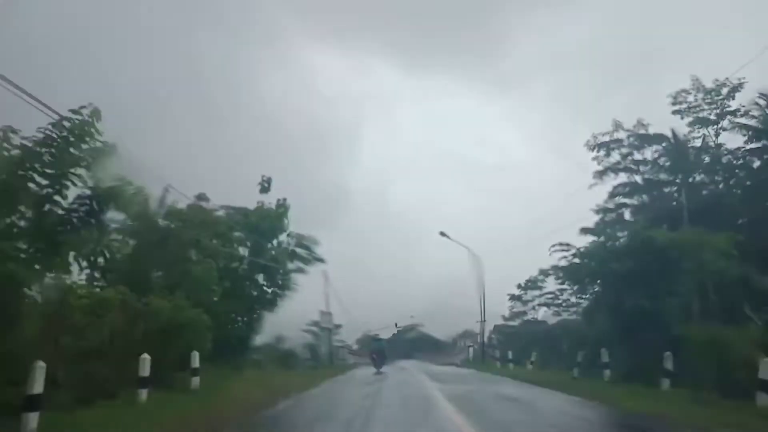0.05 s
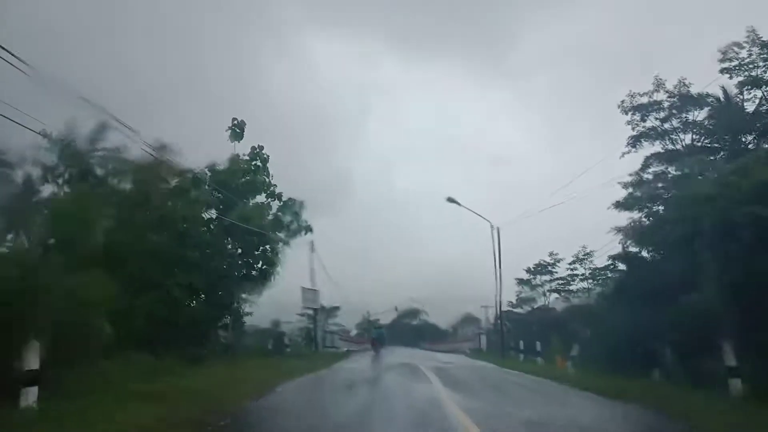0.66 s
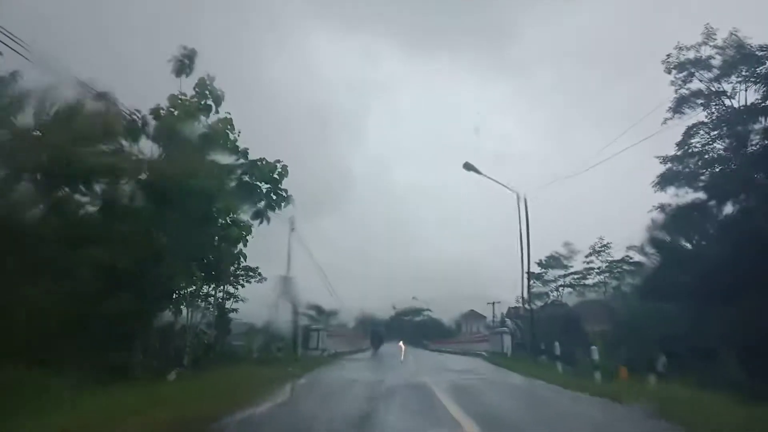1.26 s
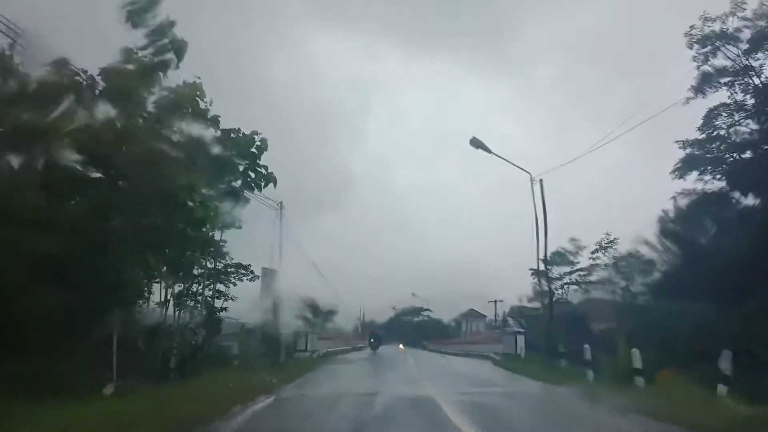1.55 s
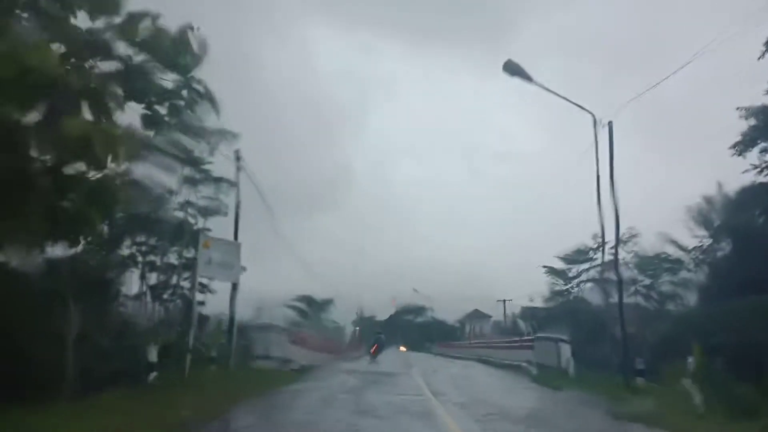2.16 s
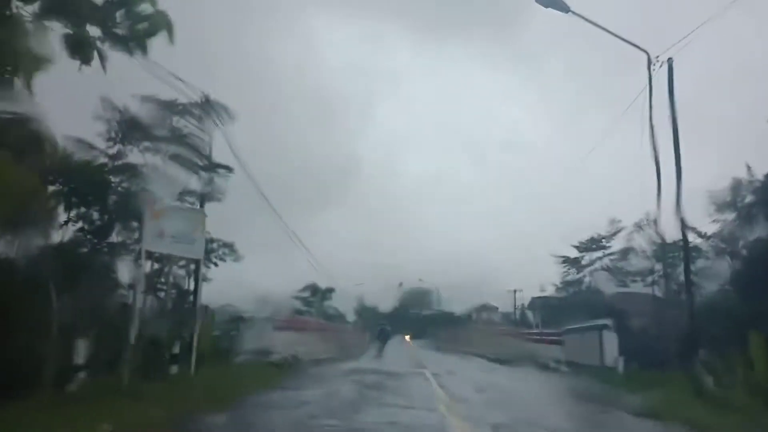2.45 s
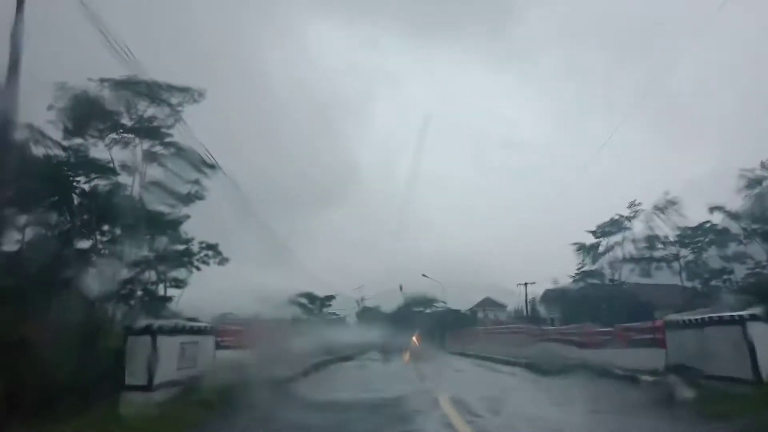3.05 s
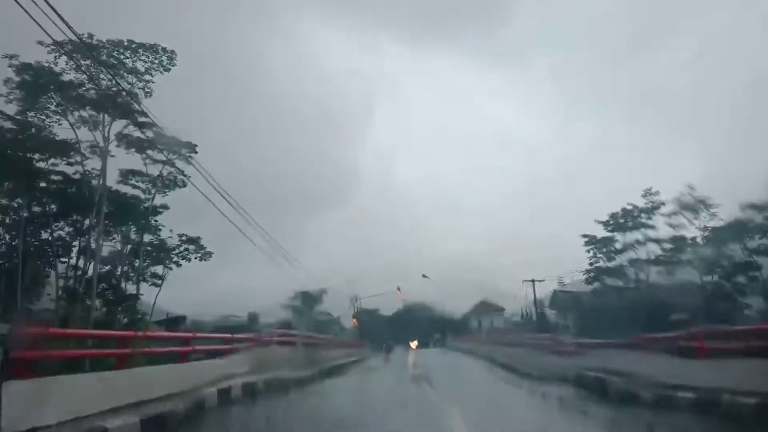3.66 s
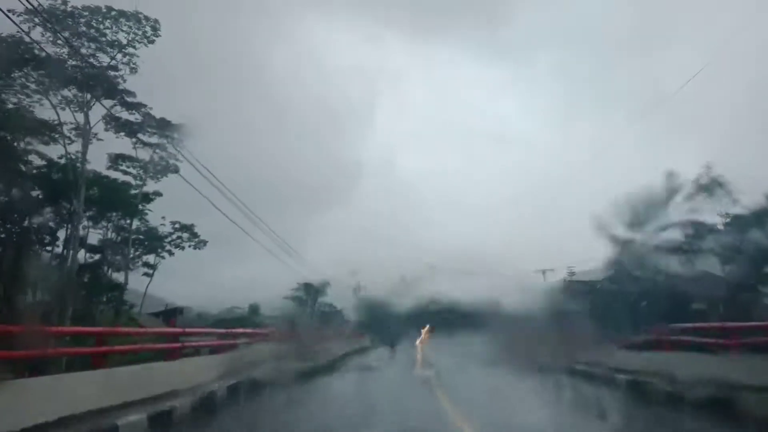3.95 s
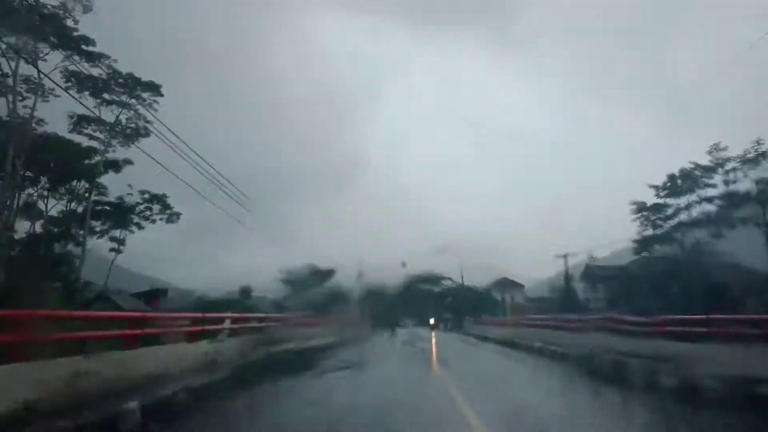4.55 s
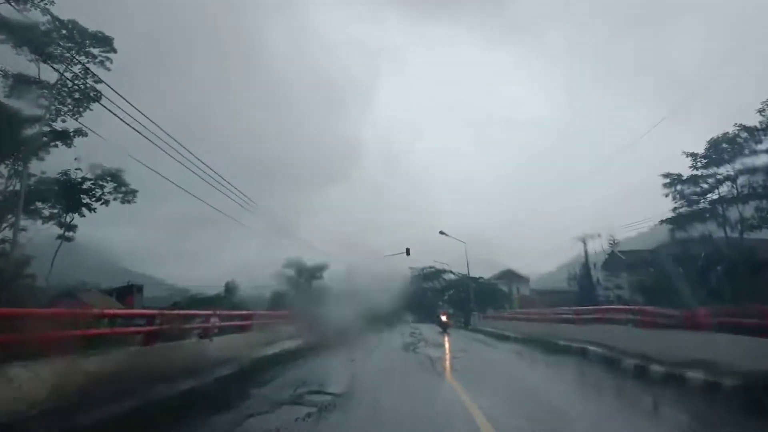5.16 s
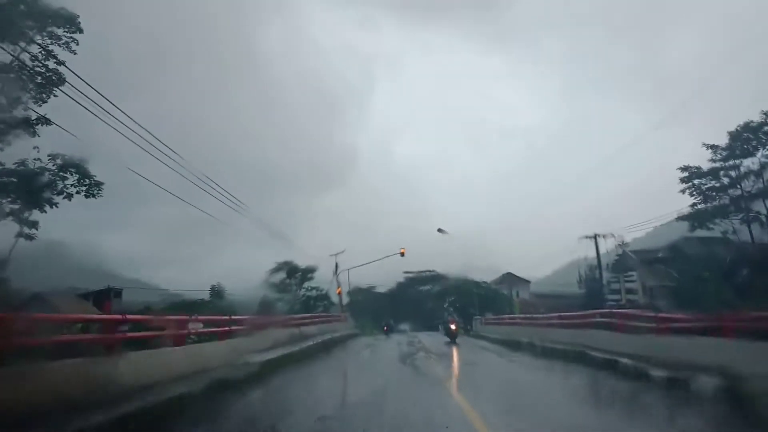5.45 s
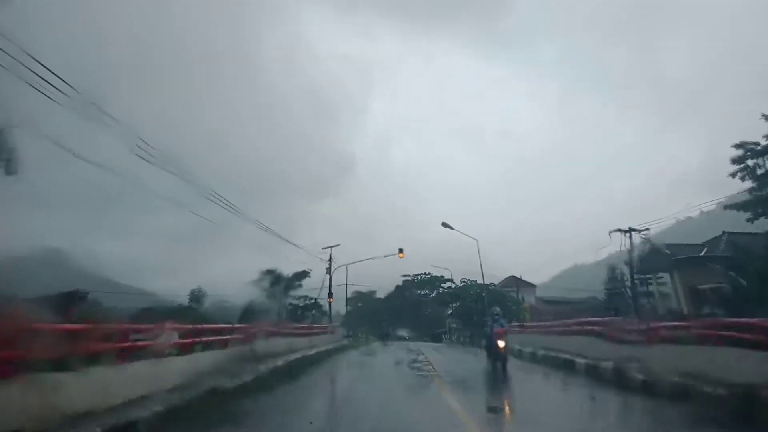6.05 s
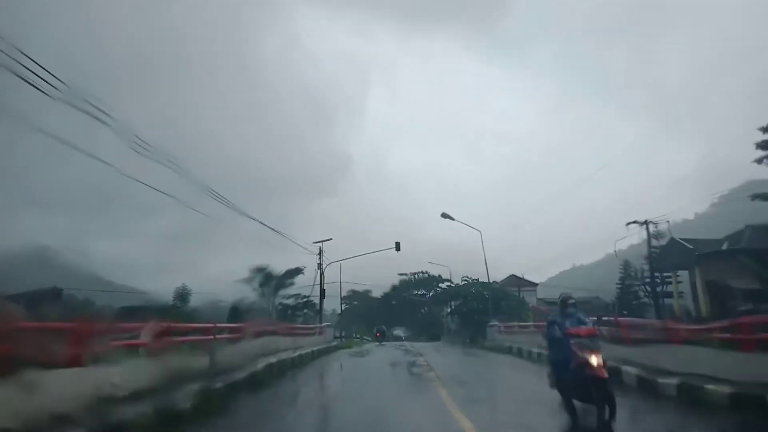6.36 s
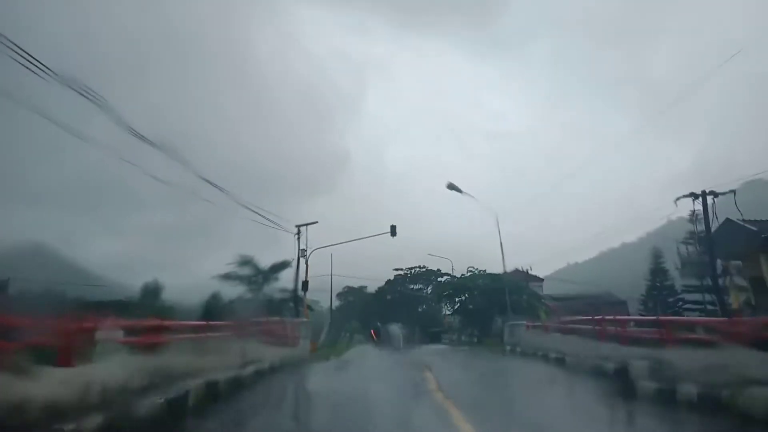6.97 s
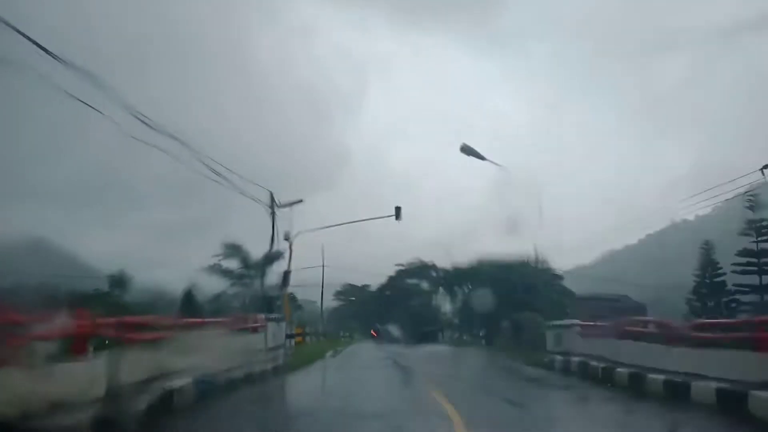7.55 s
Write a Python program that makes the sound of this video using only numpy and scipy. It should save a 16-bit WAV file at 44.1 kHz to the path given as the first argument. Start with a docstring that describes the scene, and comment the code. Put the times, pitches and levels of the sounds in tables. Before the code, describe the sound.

Inside a car driving through heavy rain, tyres rumble, drops tap the glass, a wiper occasionally knocks and road bumps thud.

```python
"""Driving through heavy rain

Inside a car, the tyres rumble and boom over a low engine hum. Drops patter on the windscreen
and drum on the roof, and water swishes under the wheels. The wiper knocks and squeaks as it
sweeps. Bumps at a bridge thump the body and make the plastic trim click."""
import sys
import numpy as np
from scipy import signal
from scipy.fft import rfft, irfft
from scipy.io import wavfile
from scipy.ndimage import uniform_filter1d

SR = 44100
rng = np.random.default_rng(int(sys.argv[2]) if len(sys.argv) > 2 else 0)


def wav_record(signal):
    """Record a signal, one row per channel, as 16-bit PCM in the file named by sys.argv[1]."""
    frames = np.transpose(np.atleast_2d(signal))
    bounded = np.clip(frames, -1, 1)
    # unit amplitude maps onto the largest positive 16-bit level
    quanta = np.round(bounded * 32767).astype(np.int16)
    wavfile.write(sys.argv[1], SR, quanta)


N = 344421
TIME = np.arange(N) / SR
RING_TIME = TIME[:SR // 4]

# tone of the road noise in the cabin: pitch_hz, level_db
ROAD_TONE = [(20, -53.5), (32, -28.5), (49, -10.5), (65, -3.5), (82, -6.5), (118, -8.5), (190, -9.5),
             (290, -12.5), (460, -17.5), (680, -23), (850, -31.5), (1300, -39.5), (3000, -72),
             (12000, -110)]
# pitches that the cabin air and panels boost: pitch_hz, width_hz, added_level_db
CABIN_RESONANCES = [(82.6, 3.7, -5), (136.4, 9, -4.5), (164, 18, -3), (194, 30, -4), (263.1, 17, 0.5),
                    (314.2, 17, 2), (426, 37, -11.5), (641, 16, -8.5), (702, 21, -6)]
# tyre noise on rougher and smoother road: time_s, level_db
TYRE_LEVELS = [(0, -23.5), (1.1, -23.5), (1.8, -26), (2.9, -23), (3.8, -22.5), (4.85, -24.5), (5.45, -23),
               (6.6, -23.5), (7.8, -23)]
# uneven stretches of road: start_s, length_s, shake_db, boom_db
UNEVEN_ROAD = [(2.624, 0.085, -43, -23), (3.202, 0.36, -36, -21), (4.22, 0.49, -31, -25.5),
               (5.834, 0.22, -30, -19), (6.2, 0.32, -28, -29), (7.488, .02, -31, -31)]
# how fast the engine fires as the car eases off, then speeds up: time_s, rate_hz
FIRING_RATES = [(0, 47), (1, 46.5), (2.3, 44.75), (3.2, 44.85), (4.3, 45.05), (5, 45.85), (6, 47.15),
                (7.8, 48.7)]
# engine overtones and gear whines: times_firing_rate, start_s, length_s, level_db
WHINES = [(2, 5.2, 1.2, -32), (4, 5.8, 1.6, -37), (6, 5.2, 1, -37), (8, 5.6, 2.2, -42),
          (9, 5.3, 1.1, -42.5), (10.15, 2.1, 4.1, -43), (14, 5.2, 1.4, -45), (18.75, 2.5, 1.9, -52.5),
          (18.75, 5.1, .9, -50.5)]
# notes that the road keeps going in the cabin: pitch_hz, start_s, length_s, level_db
DRONES = [(134.5, 0, 3.9, -31.5), (81, 6.04, .48, -21.5), (81, 6.78, .2, -23), (260, 6.0, 1.0, -31),
          (932, 6.77, .22, -48)]
# strength of the rain: time_s, level_db
RAIN_LEVELS = [(0, -42.5), (1.5, -44.5), (2.5, -43), (4.2, -43.5), (4.8, -44.5), (5.6, -42), (7.8, -43)]
# tone of rain heard through glass and roof lining: pitch_hz, level_db
RAIN_TONE = [(300, -19), (850, -0.5), (1200, -5.5), (1600, 1.5), (2050, -2.5), (2550, 0), (3200, -4.5),
             (4000, -11.5), (5000, -20.5), (6800, -28), (8600, -33), (10500, -43.5), (15000, -54.5)]
# notes at which the windscreen rings: pitch_hz
WINDSCREEN_HZ = [2620, 2540, 2870, 3150]
# puddles under the wheels: start_s, length_s, level_db
PUDDLES = [(5.4, .02, -43), (5.587, 0.055, -36.5), (6.77, 0.19, -38)]
# bumps that thump the body: start_s, peak_db, pitch_hz, rise_s, decay_s
BUMPS = [(0.039, -10, 378, 0.0023, 0.0052), (0.056, -10.5, 99, 0.0023, 0.012),
         (0.489, -20, 174, 0.01, 0.02), (0.965, -18, 163, .008, 0.031), (3.726, -11, 292, 0.0018, 0.0043),
         (3.747, -15, 163, 0.0015, 0.0093), (4.217, -7, 210, 0.0031, 0.0049),
         (4.229, -14.5, 49, 0.0045, 0.044), (4.249, -12, 151, 0.0017, .022),
         (4.296, -12.5, 121, .003, 0.018), (4.264, -16, 341, 0.0022, 0.0077),
         (4.353, -13.5, 58, 0.003, 0.016), (4.514, -6.5, 68, 0.0035, 0.01),
         (5.689, -15, 182, 0.0075, 0.021), (5.883, -8, 88, .01, 0.025), (5.889, -15, 433, .003, 0.014),
         (5.893, -11.5, 191, 0.0033, .016), (5.937, -9, 83, .025, 0.026), (7.482, -7.5, 125, 0.0041, 0.006)]
# the fattest drops on the windscreen: start_s, level_db, pitch_hz
BIG_DROPS = [(0.083, -23, 2900), (0.214, -24, 2520), (0.9968, -22, 2550), (1.701, -31, 1830),
             (2.037, -24.5, 2800), (2.368, -20.5, 2680), (2.489, -20.5, 2900), (3.6366, -27, 2690),
             (5.9955, -26, 2870), (6.3005, -24, 3050), (7.4445, -23.5, 2580), (7.5595, -23, 2500)]
# water flung by the wiper: start_s, length_s, level_db
FLUNG_WATER = (3.175, 0.17, -63.5)
# ringing of the wiper arm and the panel under it: pitch_hz, level_db, decay_s
WIPER_NOTES = [(423, 1, 0.0055), (600, 4, 0.0026), (984, -3.5, 0.0019), (1250, -5, 0.0014),
               (1605, -1, 0.0016), (2750, -13, .0012)]
# knocks as the blade flips and turns: start_s, peak_db, brightness_hz
WIPER_KNOCKS = [(3.1795, -17, 3500), (3.2005, -13, 3500), (3.206, -6.5, 1800), (3.8265, -13.5, 1300),
                (7.5045, -14, 805), (7.5114, -9, 1560)]
# the blade slaps the glass: start_s, peak_db
BLADE_SLAPS = [(3.179, -21), (3.2002, -17), (7.498, -27), (7.504, -24)]
# the arm shudders at the far end of its sweep: time_s, peak_db, pitch_hz
ARM_SHUDDERS = [(3.786, -12.5, 357), (3.831, -16, 473), (3.8435, -7.5, 387)]
# rubber scrapes the glass: start_s, length_s, level_db
BLADE_SCRAPES = [(3.182, 0.023, -34.5), (7.485, 0.026, -35)]
# thin wiper squeaks: peak_time_s, rise_s, peak_db
SQUEAKS = [(3.35, .02, -57), (3.43, .02, -66), (4.61, .015, -59), (4.73, 0.046, -60)]
# ringing of the plastic trim: pitch_hz, level_db, decay_s
TRIM_NOTES = [(1690, 1, 0.004), (3130, 19, 0.00055), (4000, 12, 0.00057), (5300, 3, 0.00035),
              (8100, -15, .0005)]
# the jolted dashboard clicks: start_s, level_db, brightness_hz
TRIM_CLICKS = [(4.2543, -4.5, 5900), (4.2573, -15, 4000), (4.285, -21, 6000), (4.293, -19.5, 4500),
               (4.3158, -20.5, 2400), (4.341, -22.5, 2500), (4.469, -22, 2400), (4.4755, -23, 2400),
               (4.553, -23, 2500), (4.605, -26, 2500)]
# loose trim rattles while the body shakes: peak_time_s, level_db
TRIM_RATTLES = [(4.215, -31.5), (4.297, -33.5), (4.472, -35.5)]


def gain(db):
    """Turn decibels into a number to multiply by."""
    return 10 ** (np.asarray(db) / 20)


def unit(x):
    """Scale a signal to an average (rms) strength of 1."""
    return x / np.sqrt(np.mean(x ** 2))


def combined_db(*gains):
    """The level of unrelated sounds heard together."""
    return 10 * np.log10(sum(g ** 2 for g in gains))


def curve(rows):
    """Join (time, value) points with straight lines."""
    return np.interp(TIME, *np.transpose(rows))


def wander(rate_hz):
    """A smooth random wobble with a typical size of 1."""
    step = max(int(SR / rate_hz), 2)
    levels = np.repeat(rng.standard_normal(N // step + 1), step)
    return unit(uniform_filter1d(levels, step)[:N])


def swell(start_s, length_s, rise_s, fade_s):
    """A loudness shape that is full by start_s, holds for length_s and dies away."""
    before = np.minimum(TIME - start_s, 0)
    after = np.maximum(TIME - start_s - length_s, 0)
    return np.exp(before / rise_s - after / fade_s)


def band(x, low_hz, high_hz, order=2):
    """Keep the sound between two pitches."""
    edges_hz = [low_hz, min(high_hz, SR / 2 - 1)]
    return signal.sosfilt(signal.butter(order, edges_hz, "band", fs=SR, output="sos"), x)


def shape_tone(x, points, size=8192):
    """Turn each pitch up or down, following (pitch_hz, level_db) points."""
    hz, db = np.transpose(points)
    grid_hz = np.maximum(np.arange(size // 2 + 1) * SR / size, 1)
    response = gain(np.interp(np.log(grid_hz), np.log(hz), db))
    # make the filter ring only after a hit, never before it
    cepstrum = irfft(np.log(response))
    cepstrum[1:size // 2] *= 2
    cepstrum[size // 2 + 1:] = 0
    return signal.fftconvolve(x, irfft(np.exp(rfft(cepstrum))))[:N]


def add(out, start_s, x, peak_db):
    """Mix a short sound in at the given time and peak level."""
    i = int(start_s * SR)
    out[i:i + len(x)] += (gain(peak_db) * x / np.abs(x).max())[:N - i]


def ring(hz, decay_s):
    """One note that dies away after a hit."""
    return np.sin(2 * np.pi * hz * RING_TIME) * np.exp(-RING_TIME / decay_s)


def impacts(per_s, spread_db, cap):
    """Hits at random times; each one's level is spread_db times a random size up to cap."""
    chance, size = rng.random(N), rng.exponential(size=N)
    hits = np.flatnonzero(chance < per_s / SR)
    out = np.zeros(N)
    out[hits] = gain(spread_db * np.minimum(size[hits], cap)) * rng.choice([-1, 1], N)[hits]
    return out


def scatter(hits, tail_db, decay_s):
    """Give each hit a short tail of scattered sound."""
    fade = np.exp(-1 / (decay_s * SR))
    energy = signal.lfilter([1 - fade], [1, -fade], hits ** 2)
    return hits + gain(tail_db) * np.sqrt(energy) * rng.standard_normal(N)


def road_levels(tyre_db):
    """Uneven road adds shake and boom, and each bump adds a burst of tyre roar."""
    shakes, booms, roars = [gain(-34)], [gain(-25.5)], [gain(tyre_db)]  # on even road
    for start_s, length_s, shake_db, boom_db in UNEVEN_ROAD:
        rocking = swell(start_s, length_s, rise_s=0.096, fade_s=0.12)
        shakes.append(rocking * gain(shake_db))
        booms.append(rocking * gain(boom_db))
    for start_s, db, *_ in BUMPS:
        roars.append(swell(start_s, 0, rise_s=0.0099, fade_s=0.074) * gain(db - 12.5))
    return combined_db(*shakes), combined_db(*booms), combined_db(*roars)


def road(shake_db, boom_db, roar_db):
    """The rough road shakes the body, booms in the cabin air and roars through the floor."""
    noise = shape_tone(rng.standard_normal(N), ROAD_TONE)
    noise = noise + sum(gain(db) * band(noise, hz - width / 2, hz + width / 2, order=1)
                        for hz, width, db in CABIN_RESONANCES)
    shake = unit(band(noise, 25, 60.8, order=6)) * gain(shake_db + 1.1)
    boom = unit(band(noise, 66.1, 109, order=4)) * gain(boom_db - 1)
    roar = unit(band(noise, 107, 16000, order=6)) * gain(roar_db + 0.5 * wander(14))
    return shake + boom + roar


def engine(boom_db, hum_hz=81.5):
    """A low hum swells with the cabin boom, and faint whines follow the engine's speed."""
    hum_phase = 2 * np.pi * np.cumsum(hum_hz * (1 + 0.02226 * wander(10))) / SR
    out = unit(np.sin(hum_phase)) * gain(boom_db - 7.5 + 1.3 * wander(4.1))
    firing_hz = curve(FIRING_RATES) * (1 + 0.0014 * wander(20))
    firing_phase = 2 * np.pi * np.cumsum(firing_hz) / SR
    for multiple, start_s, length_s, db in WHINES:
        whine = unit(np.sin(multiple * firing_phase)) * gain(db + 2.8 * wander(10))
        out += whine * swell(start_s, length_s, rise_s=0.18, fade_s=0.18)
    return out


def cabin_drones():
    """The road keeps the cabin and its panels ringing on slightly wavering notes."""
    out = np.zeros(N)
    for hz, start_s, length_s, db in DRONES:
        phase = 2 * np.pi * np.cumsum(hz + 1.592 * wander(12)) / SR
        note = unit(np.sin(phase)) * gain(db + 1.5 * wander(9))
        out += note * swell(start_s, length_s, rise_s=0.09, fade_s=0.085)
    return out


def glass_tap(hz, rise_s=0.00034):
    """The windscreen rings very briefly under a soft blow."""
    return ring(hz, decay_s=0.00048) * (1 - np.exp(-RING_TIME / rise_s))


def rain():
    """Each patch of glass rings at its own pitch. Small drops tick, fine ones hiss, the roof drums."""
    glass = 0
    for hz in np.geomspace(1000, 7000, num=9):
        hits = scatter(impacts(per_s=130, spread_db=4, cap=3.2), tail_db=0.5, decay_s=0.0011)
        glass = glass + band(hits, hz / 1.51, hz * 1.46, order=1)
    fine_drops = impacts(per_s=3000, spread_db=-0.5, cap=1.5)
    patter = unit(shape_tone(glass, RAIN_TONE))
    hiss = unit(shape_tone(fine_drops, RAIN_TONE)) * gain(-2)
    ringing = sum(signal.fftconvolve(impacts(per_s=46, spread_db=6, cap=2.47), glass_tap(hz))[:N]
                  for hz in WINDSCREEN_HZ)
    pings = unit(band(ringing, 1300, 3900)) * gain(-4)
    small_drops = scatter(impacts(per_s=75, spread_db=7, cap=2.5), tail_db=-4, decay_s=0.0012)
    ticks = unit(band(shape_tone(small_drops, RAIN_TONE), 4200, 15000, order=1))
    ticks *= gain(-10.5 + wander(4.7))
    roof = unit(band(impacts(per_s=130, spread_db=-0.5, cap=6.2), 260, 750)) * gain(-3)
    return (patter + hiss + pings + ticks + roof) * gain(curve(RAIN_LEVELS) + 0.37 * wander(20))


def wheel_spray(tyre_db):
    """Water swishes and drums on the wheel arches: a little all the time, more in puddles."""
    puddles = (swell(start_s, length_s, rise_s=0.067, fade_s=0.041) * gain(db)
               for start_s, length_s, db in PUDDLES)
    level_db = combined_db(gain(tyre_db - 27), *puddles)
    swish = unit(band(rng.standard_normal(N), 720, 1400))
    drumming = unit(band(rng.standard_normal(N), 320, 600)) * gain(2)
    return (swish + drumming) * gain(level_db + 1.4 * wander(40))


def bumps():
    """The springs pass each jolt to the car's body, which booms and settles."""
    out = np.zeros(N)
    for start_s, db, hz, rise_s, decay_s in BUMPS:
        onset = 1 - np.exp(-(RING_TIME / rise_s) ** 2)
        add(out, start_s, ring(hz, decay_s) * onset, db)
    return out


def big_drops():
    """Fat drops snap against the windscreen and splatter."""
    out = np.zeros(N)
    for start_s, db, hz in BIG_DROPS:
        add(out, start_s, glass_tap(hz), db)
    return band(scatter(out, tail_db=-15, decay_s=0.0018), 900, 6400)


def flung_water():
    """Water thrown by the wiper blade sprinkles on the glass."""
    start_s, length_s, db = FLUNG_WATER
    droplets = scatter(impacts(per_s=400, spread_db=4, cap=2), tail_db=-2, decay_s=0.001)
    sprinkle = unit(band(droplets, 4200, 8000)) * gain(db)
    return sprinkle * swell(start_s, length_s, rise_s=0.012, fade_s=0.041)


def wiper():
    """The rubber scrapes and slaps the glass and knocks the arm, which shudders at the far turn."""
    out = np.zeros(N)
    knock = sum(gain(db) * ring(hz, decay_s) for hz, db, decay_s in WIPER_NOTES)
    for start_s, db, brightness_hz in WIPER_KNOCKS:
        add(out, start_s, band(knock, 144, brightness_hz, order=4), db)
    for start_s, db in BLADE_SLAPS:
        add(out, start_s, band(glass_tap(hz=2630), 900, 3800), db)
    for time_s, db, hz in ARM_SHUDDERS:
        shudder = gain(db) * np.cos(2 * np.pi * hz * (TIME - time_s))
        out += shudder * swell(time_s, 0, rise_s=0.005, fade_s=0.0051)
    scraping = sum(swell(start_s, length_s, rise_s=0.012, fade_s=0.0045) * gain(db)
                   for start_s, length_s, db in BLADE_SCRAPES)
    slips = unit(band(impacts(per_s=2500, spread_db=-3.5, cap=2.2), 1300, 2720, order=3))
    return out + slips * scraping


def wiper_squeaks(pitch_hz=5170):
    """Rubber catches on the glass and sings a thin note that grows until it lets go."""
    phase = 2 * np.pi * np.cumsum(pitch_hz * (1 + 0.002 * wander(60))) / SR
    loudness = sum(swell(time_s, 0, rise_s, fade_s=0.008) * gain(db) for time_s, rise_s, db in SQUEAKS)
    return np.sin(phase) * loudness


def loose_trim():
    """Loose plastic snaps and rattles on. Each click rings a bit differently; soft ones are mostly duller."""
    clicks = np.zeros(N)
    for start_s, db, brightness_hz in TRIM_CLICKS:
        click = sum(gain(note_db + 2 * rng.standard_normal()) * ring(hz, decay_s)
                    for hz, note_db, decay_s in TRIM_NOTES)
        add(clicks, start_s, band(click, 700, brightness_hz, order=1), db)
    shaking = sum(swell(time_s, 0, rise_s=0.015, fade_s=0.015) * gain(db) for time_s, db in TRIM_RATTLES)
    rattle = unit(band(impacts(per_s=640, spread_db=2, cap=3.6), 1100, 2900, order=3)) * shaking
    return band(scatter(clicks, tail_db=-10, decay_s=0.0014), 700, 6900, order=3) + rattle


def scene():
    """Mix the car and the rain as heard behind the windscreen, in one channel."""
    tyre_db = curve(TYRE_LEVELS)
    shake_db, boom_db, roar_db = road_levels(tyre_db)
    car = road(shake_db, boom_db, roar_db) + engine(boom_db) + cabin_drones() + bumps()
    wiping = wiper() + flung_water() + wiper_squeaks()
    return (car + wiping + loose_trim() + rain() + big_drops() + wheel_spray(tyre_db))[None]


def record(dry, top_hz=15500):
    """Cut away the very highest treble."""
    return signal.sosfilt(signal.ellip(8, 0.2, 70, top_hz, fs=SR, output="sos"), dry)


dry = scene()
out = record(dry)
wav_record(out)
```